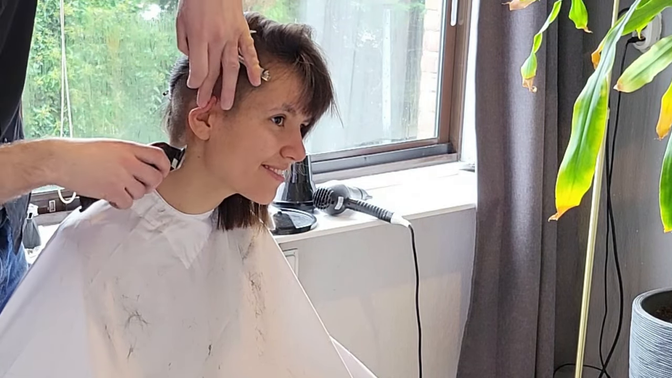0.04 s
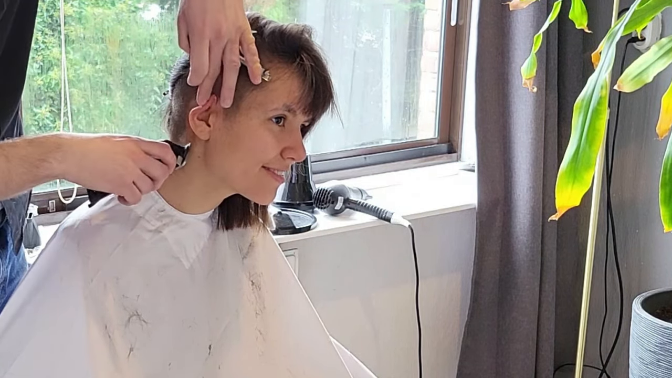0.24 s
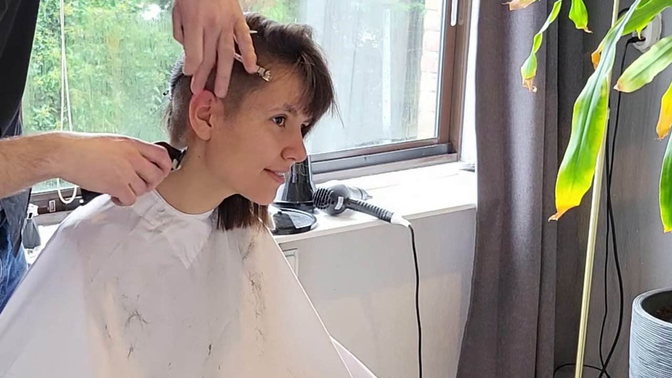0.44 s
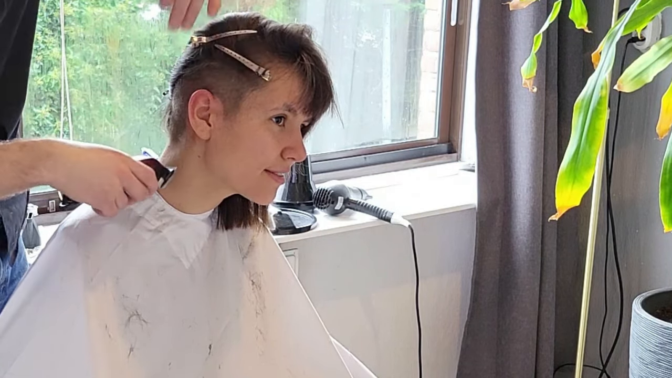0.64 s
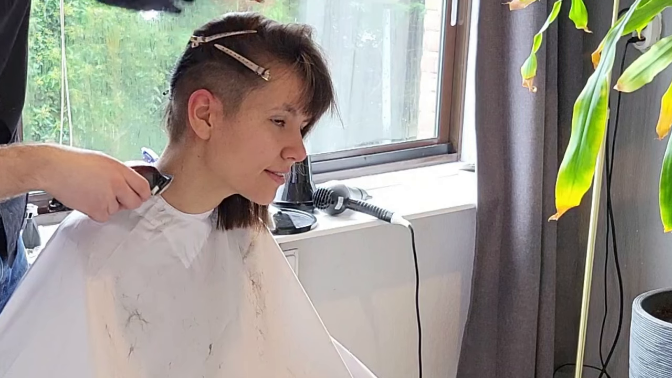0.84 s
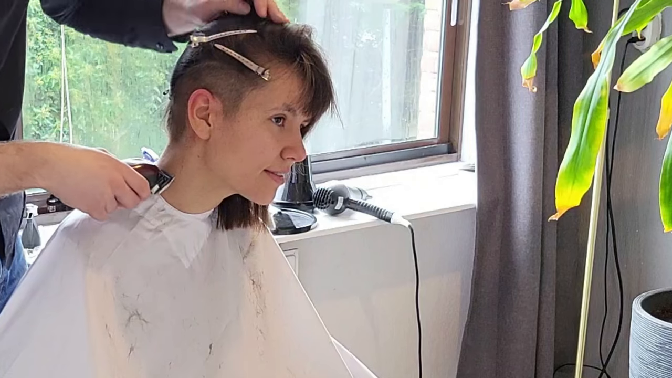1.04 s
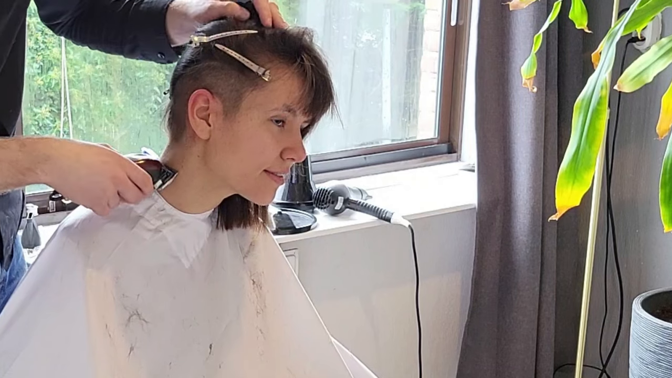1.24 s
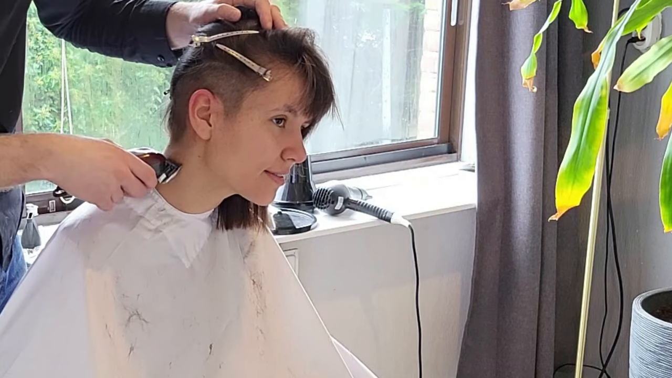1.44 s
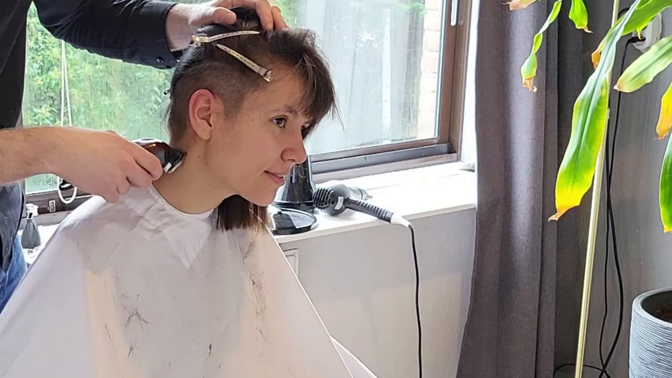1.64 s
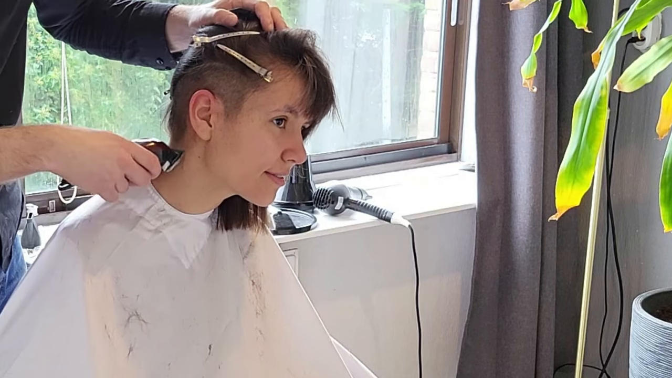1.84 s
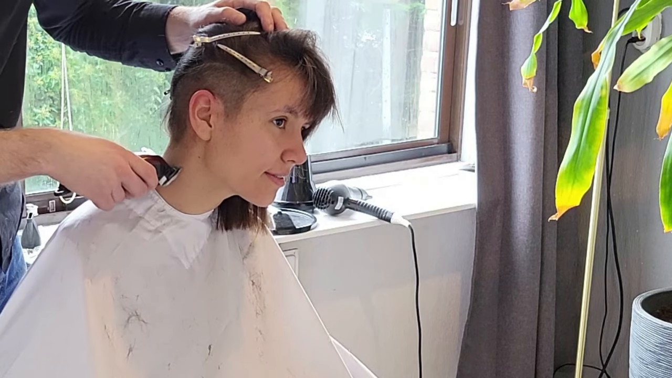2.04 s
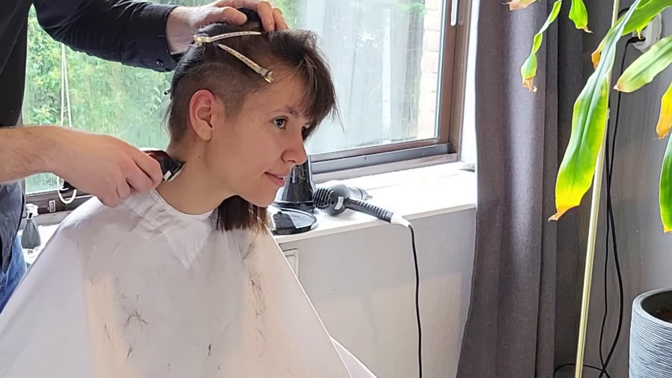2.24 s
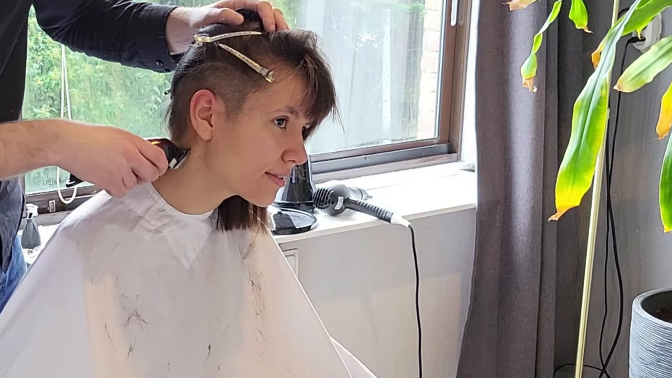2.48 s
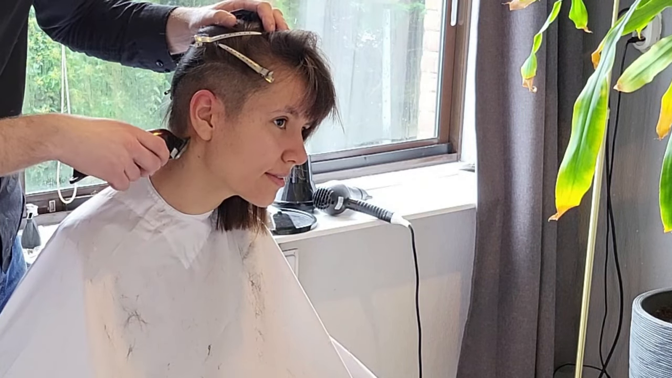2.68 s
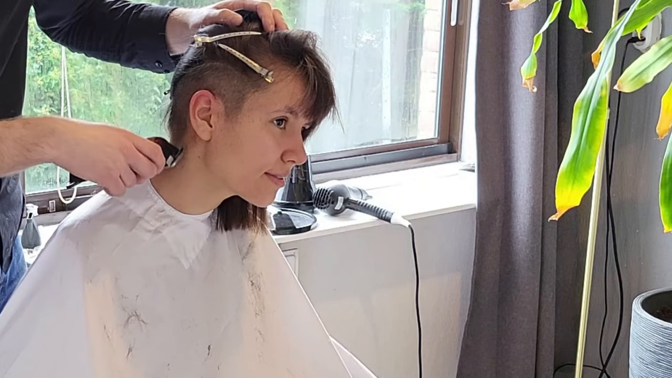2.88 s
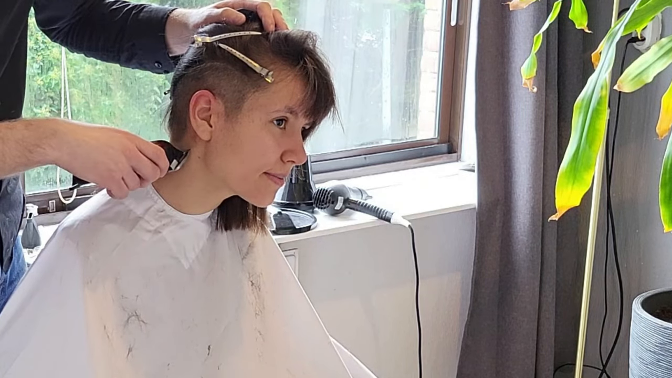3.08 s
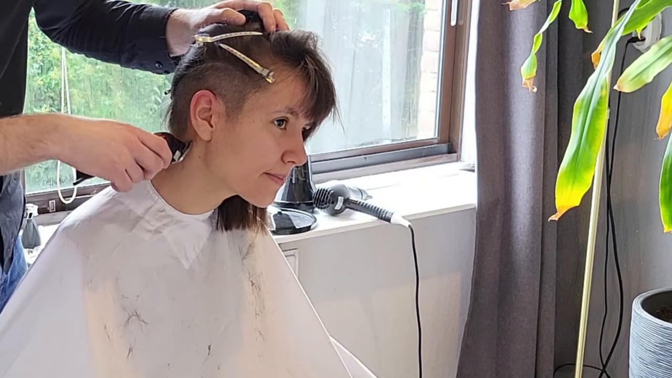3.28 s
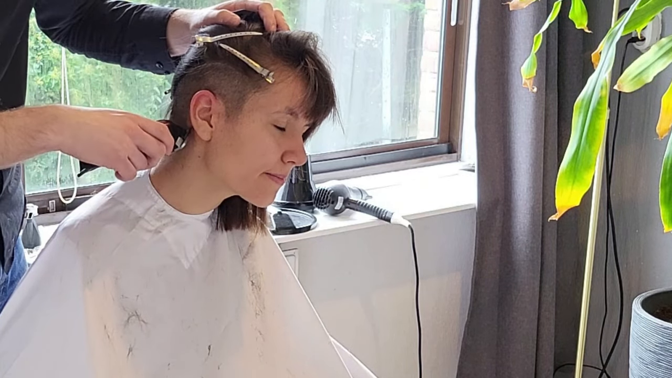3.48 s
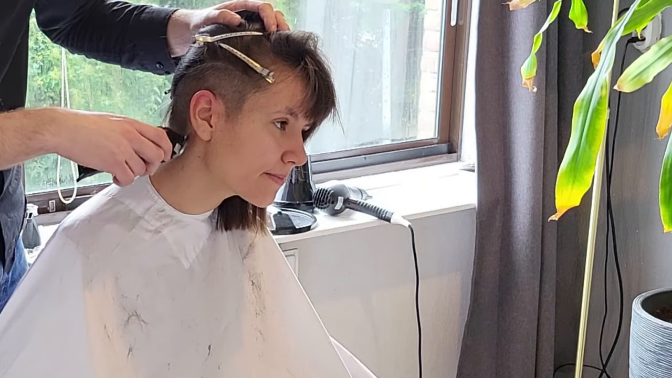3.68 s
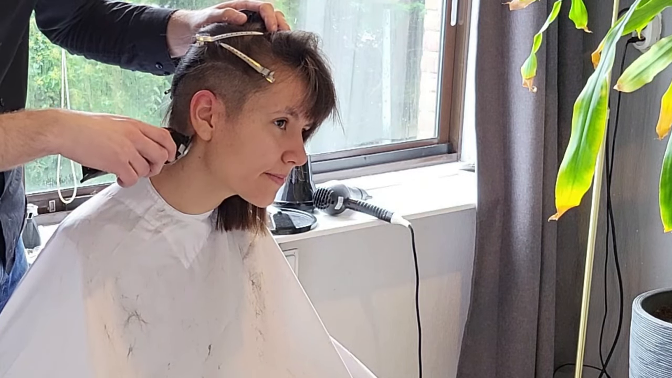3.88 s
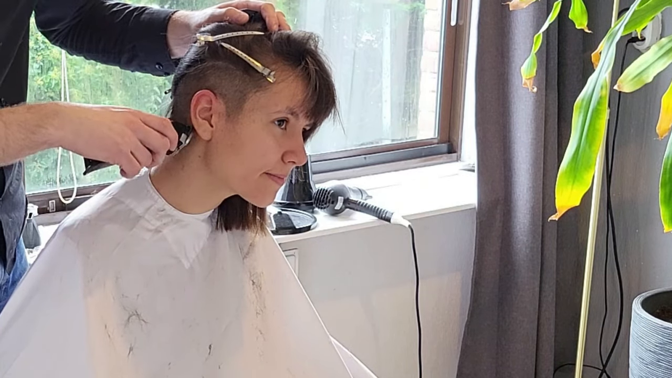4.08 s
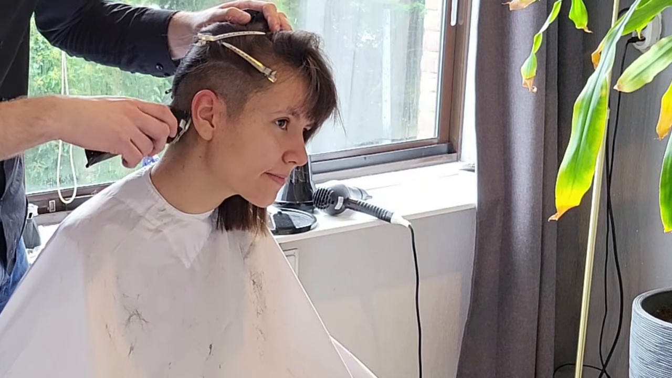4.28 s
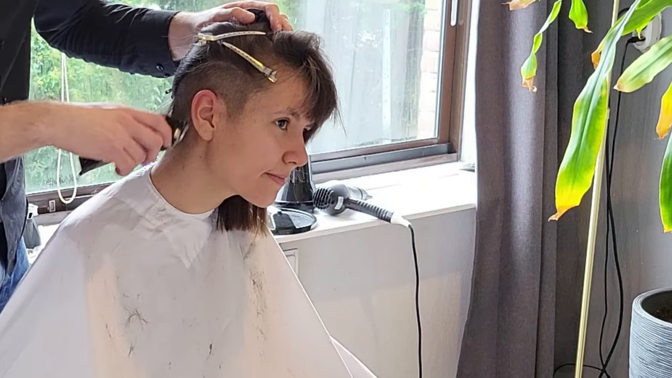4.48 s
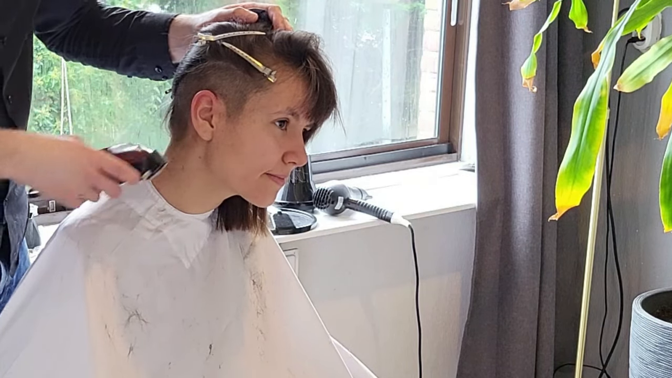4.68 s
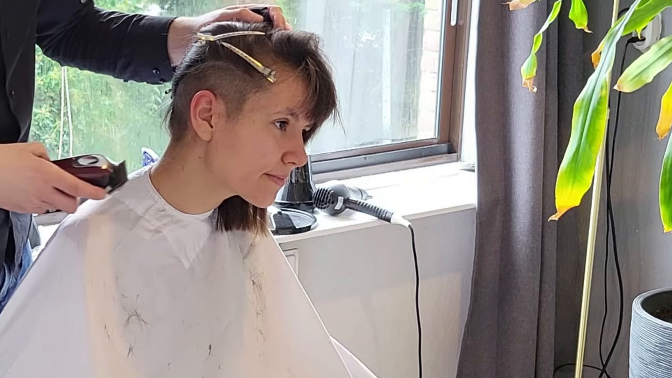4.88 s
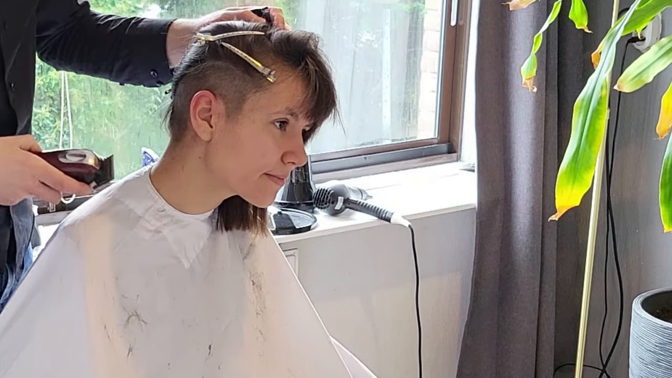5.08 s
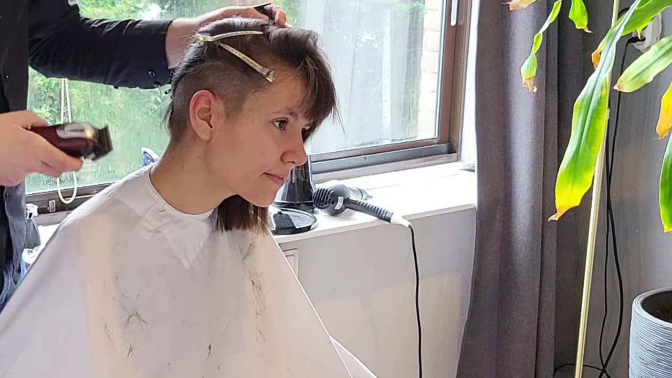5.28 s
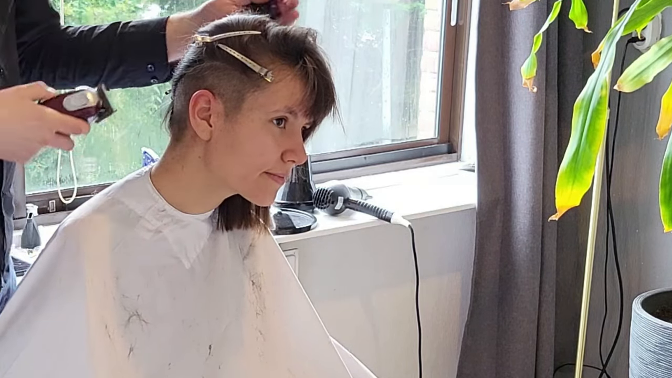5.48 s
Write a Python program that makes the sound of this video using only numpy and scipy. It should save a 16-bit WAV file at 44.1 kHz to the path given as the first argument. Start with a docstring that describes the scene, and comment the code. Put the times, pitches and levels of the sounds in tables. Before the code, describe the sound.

A cordless hair clipper runs close to the microphone in a small salon, giving a steady motor hum with a fast, bright metallic rattle from the blade. Its tone shifts slightly as it bites into hair and lifts off the skin. After about five seconds it is switched off with a sharp snap and a soft low thump. Fingers faintly brush out of the hair. A low room rumble lies underneath.

```python
"""A cordless hair clipper trims behind an ear in a small salon, then is switched off with a sharp snap.
Its steel blade clacks at each turn of its stroke and shears hair. Its motor shakes the housing into
a hum of many tones; it slows as the teeth bite, and the hum thins when it lifts off the skin.
The room rumbles low, with a soft thump at the switch-off, and a hand brushes out of the hair."""
import sys
import numpy as np
from scipy import signal
from scipy.fft import rfft, irfft, next_fast_len
from scipy.io import wavfile
from scipy.ndimage import uniform_filter1d, map_coordinates

SR = 44100
rng = np.random.default_rng(int(sys.argv[2]) if len(sys.argv) > 2 else 0)


def wav_out(sig):
    """Save sig, one row per channel (or a flat mono array), as 16-bit PCM at SR to the path in sys.argv[1]."""
    wavfile.write(sys.argv[1], SR, np.round(np.clip(np.atleast_2d(sig).T, -1, 1) * 32767).astype(np.int16))


N = 243431
OFF_S = 5.085  # the motor's power is cut


def amp(db):
    """Turn decibels into a factor to multiply by."""
    return 10 ** (np.asarray(db) / 20)


def unit(x):
    """Scale a signal to an average strength (rms) of 1."""
    return x / np.sqrt(np.mean(np.abs(x) ** 2) + 1e-20)


def along(points, hz):
    """Read between (frequency, value) points, with octaves evenly spaced."""
    freqs, values = np.transpose(points)
    return np.interp(np.log(hz + 1), np.log(freqs + 1), values)


def clock():
    """The time of every sample, in seconds."""
    return np.arange(N) / SR


def curves(rows):
    """Join a table's rows with straight lines: one curve for each column after the time."""
    times, *columns = np.transpose(rows)
    return [np.interp(clock(), times, column) for column in columns]


def swells(rows):
    """Add up smooth bumps, each with a middle, a half length and a height."""
    return sum(height * np.exp(-((clock() - middle) / half) ** 2) for middle, half, height in rows)


def wobble(rate):
    """A smooth curve through `rate` random values a second."""
    coarse = clock()[::64]
    knots = rng.standard_normal(4096)
    return np.interp(clock(), coarse, map_coordinates(knots, [coarse * rate + 2], mode="wrap"))


def filtered(x, response):
    """Turn each frequency up or down by response(hz)."""
    size = next_fast_len(N + SR // 2)
    return irfft(rfft(x, size) * response(np.fft.rfftfreq(size, 1 / SR)), size)[..., :N]


# The treble is stronger at the right microphone: f/Hz, left minus right/dB
MIC_BALANCE = [(1500, 0), (4400, -2), (8000, -1), (11000, -5.5), (14500, -12)]
def coloured(x, spectrum):
    """Give a stereo sound a tone colour and the microphones' balance."""
    def response(hz):
        gain_db = along(spectrum, hz) + np.outer([.5, -.5], along(MIC_BALANCE, hz))
        # this folding makes the filter ring after a click, not before it
        cepstrum = irfft(np.log(amp(gain_db)))
        cepstrum[:, 1:] *= 2
        cepstrum[:, cepstrum.shape[1] // 2:] = 0
        return np.exp(rfft(cepstrum))
    return filtered(x, response)


def noise(spectrum, alike):
    """Coloured stereo noise; left and right move together at alike=1 and are unrelated at 0."""
    mid, side = rng.standard_normal((2, N))
    turn = np.arccos(np.clip(alike, -1, 1)) / 2
    pair = np.cos(turn) * mid + np.outer([1, -1], np.sin(turn) * side)
    return unit(coloured(pair, spectrum))


def pulses(times, sizes):
    """Sharp clicks at exact times, even between two samples."""
    at = times[:, None] * SR
    taps = np.floor(at).astype(int) + np.arange(-7, 9)
    shape = np.sinc(taps - at) * np.cos(np.pi * (taps - at) / 16) ** 2
    return np.bincount(np.clip(taps, 0, N).ravel(), (shape * sizes[:, None]).ravel(), N + 1)[:N]


# How long the room echoes (t60 is the time to fade by 60 dB): f/Hz, t60/s
ROOM_ECHO = [(200, 0.93), (1000, 0.16), (3500, 0.35), (8000, 0.25), (15000, 0.23)]
def click_path(ring_t60, room_db):
    """One click as each microphone gets it: a brief ring, then the room's echo."""
    hz, t, bands = signal.stft(rng.standard_normal((2, SR // 3)), SR, nperseg=256)
    fade = amp(-60 * t / along(ROOM_ECHO, hz)[:, None])
    echo = signal.istft(bands * fade, SR, nperseg=256)[1]
    age = np.arange(echo.shape[1]) / SR
    echo = echo * np.clip(age / 0.004, 0, 1)
    ring = rng.standard_normal(echo.shape) * amp(-60 * age / ring_t60)
    both = np.array([unit(side) for side in ring]) + amp(room_db) * unit(echo)
    return both / np.linalg.norm(both[0])


# Swells of low rumble: start t/s, length/s, level/dB
RUMBLE_SWELLS = [(.26, .08, -64), (0.573, 0.13, -61.5), (0.915, .05, -62.5), (1.41, .27, -63),
                 (1.794, 0.41, -59.5), (2.495, 0.29, -60), (2.93, 0.0597, -65), (3.43, 0.37, -62),
                 (3.84, .07, -62.5), (4.056, 0.06, -59), (4.201, .16, -60), (4.47, 0.13, -60),
                 (4.649, 0.17, -60.5), (5.38, 0.077, -64.5)]
# Tone colours of the rumble and of the still air: f/Hz, level/dB
RUMBLE_COLOUR = [(20, -41.5), (42, -25.5), (54, -13), (62, 4), (74, -13), (88, -14), (110, -18), (170, -26),
                 (400, -53.5)]
AIR_COLOUR = [(30, -13), (140, -0.5), (220, -3.5), (400, -15.5), (1000, -19.5), (4000, -28), (9000, -26),
              (14000, -22)]
def salon(rise_s=.025, fall_s=.035, floor_db=-71, waver_db=2.5, sink_db_per_s=55):
    """Still air, and a rumble that swells over a wavering floor, which sinks once the clipper is off."""
    now = clock()
    level = amp(floor_db + waver_db * wobble(8) - sink_db_per_s * np.maximum(now - OFF_S, 0))
    for start, length, db in RUMBLE_SWELLS:
        outside = np.maximum(start - now, 0) / rise_s + np.maximum(now - start - length, 0) / fall_s
        level = np.maximum(level, amp(db - 0.5) * np.exp(-outside))
    boom = noise(RUMBLE_COLOUR, alike=0.9)
    power = uniform_filter1d(np.mean(boom ** 2, axis=0), SR // 10)
    steady = boom / np.sqrt(np.abs(power) + 1e-6)  # even out the noise's own swells
    lean_left = amp([[1.1], [-1.1]])
    return level * steady * lean_left + amp(-71) * noise(AIR_COLOUR, alike=0.49)


def brush(middle_s=5.455, half_s=0.066, db=-72):
    """Fingers slide out of the hair with a faint hiss."""
    hair = noise([(4500, -31), (7300, 4), (9500, -13.5), (13500, 4), (16000, -13.5)], alike=0)
    return swells([(middle_s, half_s, amp(db))]) * hair


# Low notes at which the room booms: f/Hz, level/dB, t60/s
ROOM_NOTES = [(60.4, 8, 0.34), (87, -3, .36), (126.8, -14, .5), (166, -20.5, 0.63)]
def thump(start_s=5.04, rise_s=0.04, gain_db=-43):
    """A soft low bump swells and booms in the room."""
    age = np.maximum(clock() - start_s, 0)
    boom = sum(amp(level - 60 * age / t60) * np.sin(2 * np.pi * hz * age)
               for hz, level, t60 in ROOM_NOTES)
    return amp(gain_db) * (1 - np.exp(-age / rise_s)) ** 2 * boom


# Clicks as the switch slides, then seats: t/s, level/dB
SWITCH_CLICKS = [(5.0752, -5), (5.0767, -2.5), (5.0795, -1.5)]
# Tone colour of the snap: f/Hz, level/dB
SNAP_COLOUR = [(200, -39), (800, -26), (1500, -19), (2500, -15.5), (3600, -14), (4500, -15.5),
               (6300, -14.5), (7500, -2.5), (9000, -17.5), (10200, -13), (11500, -4.5), (13800, -2),
               (15500, -11.5)]
def switch():
    """The slide switch snaps over; the plastic case rings on briefly."""
    times, db = np.transpose(SWITCH_CLICKS)
    clicks = pulses(times, amp(db + 16.5))
    snap = signal.fftconvolve(clicks[None], click_path(ring_t60=0.007, room_db=0.5), axes=1)[:, :N]
    age = np.maximum(clock() - times[0], 0)
    case = noise([(1800, -44.5), (2800, -6), (3600, 2.0), (4000, -8), (5200, -54)], alike=0)
    return coloured(snap, SNAP_COLOUR) + case * (age > 0) * amp(-33 - 250 * age)


def hum(strokes, tones, wander, drift_hz, scatter):
    """Pure tones locked to the stroke; reflections make each swell and fade at each microphone."""
    out, now = np.zeros((2, N)), clock()
    coarse = now[::128]
    for multiple, db, tilt_db, alike in tones:
        apart = np.arccos(np.clip(alike, -1, 1))
        tone = np.exp(1j * (2 * np.pi * round(multiple) * strokes + scatter * rng.standard_normal()))
        for ear, side in enumerate([.5, -.5]):
            drift = [map_coordinates(rng.standard_normal(128), [coarse * drift_hz + 2], mode="wrap")
                     for _ in range(2)]
            direct = np.exp(-1j * side * apart)
            reflected = wander * (drift[0] + 1j * drift[1])
            gain = np.sqrt(2) * amp(db + side * tilt_db) * unit(direct + reflected)
            out[ear] += (np.interp(now, coarse, gain) * tone).real
    return out


# The motor's tones: multiple of the stroke rate, free-running level/dB, left minus right/dB,
# left-right likeness, change with slowing/(dB per Hz), change when lifted/dB
MOTOR_TONES = [(2, -81.5, -4, .99, 2.5, -2), (3, -77, 0, 1, 0.5, -2), (4, -73, -3.5, 0.74, -2, 0),
               (5, -62, 2, 0.037, -6.5, 6), (6, -70.5, 1.8, 0.42, 7, 2.5),
               (7, -54.5, -7.5, 1, -11.5, -11.5), (8, -69.5, 9, -0.59, 2.5, -0.5),
               (9, -70.5, -2.5, 1, 7.5, -1.5), (10, -64.5, -3.5, 0.43, -0.5, -8.5),
               (11, -57, 7, .67, -2, 0), (12, -58, -4, -0.75, 1.5, -2), (13, -53.5, -.5, 0.51, 0.2, -6.5),
               (14, -51, 2, -0.96, -4.5, -8), (15, -62.5, -19.5, -1.4, -4.5, 4),
               (16, -54.5, 2.5, 0.84, 2.5, -2), (17, -54, -0.5, -0.55, 5.5, -4),
               (18, -57, -3, -0.7, 1, -5.5), (19, -53, 1.5, -0.48, -1, 1), (20, -54, -3.5, -0.55, 0, 2),
               (21, -54.5, -1, -0.46, 3.5, -10)]
# The clipper lifts off the skin: middle t/s, half length/s, how far (1 = well clear)
SKIN_LIFTS = [(1.12, 0.13, 0.66), (2.186, 0.081, .55), (5.009, 0.16, 1.1)]
# The teeth bite into thick hair and the hum turns nasal: middle t/s, half length/s, boost/dB
HAIR_BITES = [(1.44, 0.053, 6), (2.93, 0.098, 5)]
def motor(strokes, speed_hz, free_hz=74.565, lag_s=.06, nasal_hz=1475, nasal_width_hz=310):
    """The hum changes colour with lifts and bites, and just after hair slows the motor below free_hz."""
    now = clock()
    slowing_hz = np.interp(now - lag_s, now, free_hz - speed_hz)
    lifted, bite_db = swells(SKIN_LIFTS), swells(HAIR_BITES)
    out = np.zeros((2, N))
    for *tone, db_per_hz, lifted_db in MOTOR_TONES:
        nasal = np.exp(-((tone[0] * free_hz - nasal_hz) / nasal_width_hz) ** 2)
        work_db = db_per_hz * slowing_hz + lifted_db * lifted + nasal * bite_db
        out += amp(work_db) * hum(strokes, [tone], wander=0.31, drift_hz=2.806, scatter=2.38)
    return out


# The shell's middle and upper tones:
# multiple of the stroke rate, level/dB, left minus right/dB, left-right likeness
MIDDLE_TONES = [(22, -11, -8.5, 0.26), (23, 4.5, -3, -0.26), (24, 2, 10, 0.37), (25, -2.5, 5.5, 0.31)]
UPPER_TONES = [(26, 1.5, -24, 0.88), (27, -17, 4, -1.1), (28, -1.5, 6.5, 0.32), (29, 3, -2, -0.26),
               (30, -10.5, 5, 0.65), (31, 1, 7, -0.52), (32, 1.5, 3, 0.74), (33, 4.5, 8.5, 0.69),
               (34, -2, -25, -0.35), (35, -36, 10, -0.66), (36, -17.5, 8, 0.068)]
# How they rise and fall as grip and angle change: t/s, middle level/dB, upper level/dB
SHELL_LEVELS = [(0.04, -41.5, -48), (0.64, -45.5, -42.5), (0.76, -47.5, -40), (1.18, -42, -42),
                (1.6, -53, -47.5), (1.72, -54, -49), (1.84, -44, -41.5), (2.08, -47.5, -42),
                (2.92, -44.0, -45.5), (3.1, -48, -42), (3.52, -45.5, -50), (4.06, -41.5, -49.5),
                (4.18, -45.5, -51), (4.3, -40.0, -46.5), (4.6, -43.0, -45.5), (4.72, -44, -54),
                (4.78, -42, -52), (5.02, -49, -49.5)]
def shell(strokes):
    """Shaken by the motor, the housing's shell rings in two ranges of pitch."""
    middle_db, upper_db = curves(SHELL_LEVELS)
    middle = unit(hum(strokes, MIDDLE_TONES, wander=0.44, drift_hz=2.75, scatter=2.38))
    upper = unit(hum(strokes, UPPER_TONES, wander=0.66, drift_hz=2.801, scatter=2.13))
    return amp(middle_db - 3.5) * middle + amp(upper_db - 4.5) * upper


def moving_hand(x, ring_t60, room_db, places=6):
    """As the hand travels, one path to the microphones fades into the next."""
    place = clock() / OFF_S * (places - 1)
    out = np.zeros((2, N + SR))
    for k in range(places):
        near = np.flatnonzero(np.abs(place - k) < 1)
        share = np.cos(np.pi / 2 * (place[near] - k))
        heard = signal.fftconvolve((x[near] * share)[None], click_path(ring_t60, room_db), axes=1)
        out[:, near[0]:near[0] + heard.shape[1]] += heard
    return out[:, :N]


def clatter(strokes, positions, levels_db, load_db, jitter_s, size_db, grit, grit_s, room_db):
    """Blade contacts of uneven size and timing; each rings and trails a puff of shearing noise."""
    turns = np.arange(int(strokes[int(OFF_S * SR)]))
    # pressure on the hair shifts the motor's steady drive from one contact to another
    loads = np.array([amp(db + load_db * wobble(3.034)[turns * N // len(turns)]) for db in levels_db])
    loads = loads / np.linalg.norm(loads, axis=0)
    out = np.zeros((2, N))
    for position, load in zip(positions, loads):
        chance = rng.standard_normal((len(turns), 2))
        times = np.interp(turns + position, strokes, clock()) + jitter_s * chance[:, 0]
        hits = pulses(times, load * amp(size_db * chance[:, 1]))
        trail = signal.lfilter([1], [1, -np.exp(-1 / (grit_s * SR))], np.abs(hits))
        puffs = grit * np.std(hits) * unit(trail * rng.standard_normal(N))
        out += moving_hand(hits + puffs, ring_t60=.0028, room_db=room_db)
    return out


# Where the blade makes contact in one stroke: position (0 to 1), clack level/dB, sizzle level/dB
BLADE_CONTACTS = [(.08, -3, -3), (.32, -10, -1.5), (.58, 1, -14), (.72, -11, -7), (.97, -12.5, 2.5)]
# How the blade's sounds rise and fall: t/s, clack level/dB, sizzle level/dB, ring level/dB
BLADE_LEVELS = [(0.04, -36.5, -36, -44.5), (0.46, -38.0, -36.5, -46.5), (0.7, -37, -35, -43),
                (0.82, -40, -37.0, -44), (1.48, -38.0, -37, -42), (1.72, -38.5, -38.5, -43.5),
                (1.84, -39, -37.5, -44.0), (2.14, -37, -37.0, -44.5), (2.44, -38.5, -36.5, -45.5),
                (2.92, -38, -37.5, -47.5), (3.22, -37, -37.5, -48), (3.34, -38.5, -36.5, -45.5),
                (4.48, -37, -38, -46), (4.66, -37.5, -35, -48), (4.72, -38.5, -38, -41.5),
                (5.02, -40.5, -36.0, -47)]
# Tone colours of clacking and ringing steel, crossing teeth and sheared hair: f/Hz, level/dB
CLACK_COLOUR = [(1500, -52), (2400, 1.5), (2800, -7.5), (3300, -3.5), (3850, -12.5), (4500, -4.5),
                (5300, .5), (6300, 1.5), (7600, -1), (8700, -9), (10000, -22), (12000, -42)]
RING_COLOUR = [(2600, -46), (3400, -25.5), (3700, -2), (3950, 3.5), (4300, -4), (5500, -62.5)]
SIZZLE_COLOUR = [(7000, -37.5), (9500, -12), (11000, -8), (12300, -5), (13800, -0.5), (15000, -7),
                 (16000, -8.5)]
SHEAR_COLOUR = [(150, -21), (300, -11.5), (700, -12), (1200, -1.5), (1800, 2), (2600, -2.5), (4000, -9.5),
                (8000, -44.5)]
def blade(strokes):
    """Steel clacks at the stroke's turns and rings; the teeth sizzle as they cross and shear hair."""
    clack_db, sizzle_db, ring_db = curves(BLADE_LEVELS)
    positions, clack_sizes, sizzle_sizes = np.transpose(BLADE_CONTACTS)
    steel = clatter(strokes, positions, clack_sizes, load_db=2.5, jitter_s=2e-6, size_db=0.65,
                    grit=0.37, grit_s=0.0011, room_db=5.5)
    teeth = clatter(strokes, positions, sizzle_sizes, load_db=2.0, jitter_s=3e-6, size_db=0.3,
                    grit=0.61, grit_s=0.0013, room_db=3.5)
    clack = amp(clack_db - 2.5) * unit(coloured(steel, CLACK_COLOUR))
    ring = amp(ring_db - 2.5) * unit(coloured(steel, RING_COLOUR))
    sizzle = amp(sizzle_db - 2.0) * unit(coloured(teeth, SIZZLE_COLOUR))
    shear = amp(-54.0 - 220 * np.maximum(clock() - OFF_S, 0)) * noise(SHEAR_COLOUR, alike=0.42)
    return clack + ring + sizzle + shear


# The motor's speed, sagging as the teeth bite into hair: t/s, stroke rate f/Hz
MOTOR_SPEED = [(0.0, 73.9), (0.18, 73.24), (1.15, 74.43), (1.4, 73.27), (1.84, 73.76), (1.91, 73.85),
               (2.16, 74.32), (2.38, 73.87), (2.72, 74.16), (2.89, 73), (3.51, 73.88), (3.73, 73.76),
               (3.9, 74.06), (4.06, 73.9), (4.13, 73.64), (4.56, 72.92), (4.79, 73.67), (5.04, 74.04)]
def clipper(flutter_hz=0.0298, fade_db_per_s=230):
    """One slightly fluttering motor drives housing and blade; the hum dies once the power is cut."""
    speed_hz, = curves(MOTOR_SPEED)
    strokes = np.cumsum(speed_hz + flutter_hz * wobble(25)) / SR  # strokes made so far
    housing = motor(strokes, speed_hz) + shell(strokes)
    fade = amp(-fade_db_per_s * np.maximum(clock() - OFF_S, 0))
    return housing * fade + blade(strokes)


def scene():
    """The clipper and its switch, with the thump, the hand and the salon behind them."""
    return clipper() + switch() + thump() + brush() + salon()


def record(dry, ceiling=0.67, top_hz=15850):
    """The microphone rounds off the sharpest peaks and keeps nothing above top_hz."""
    rounded = dry / (1 + (dry / ceiling) ** 4) ** (1 / 4)
    return filtered(rounded, lambda hz: hz < top_hz)


dry = scene()
out = record(dry)
wav_out(out)
```